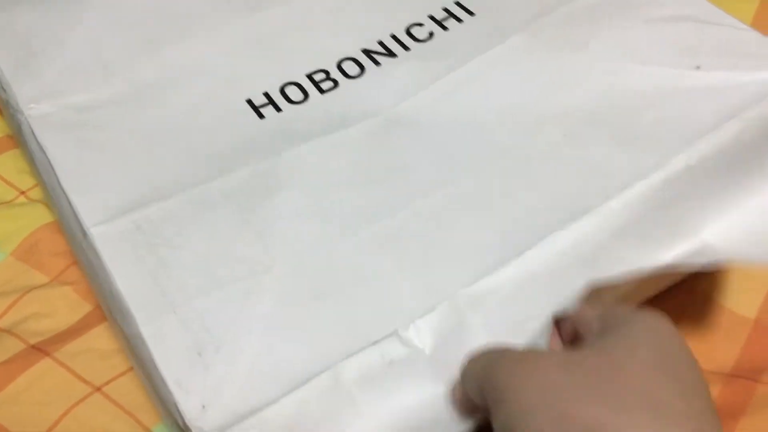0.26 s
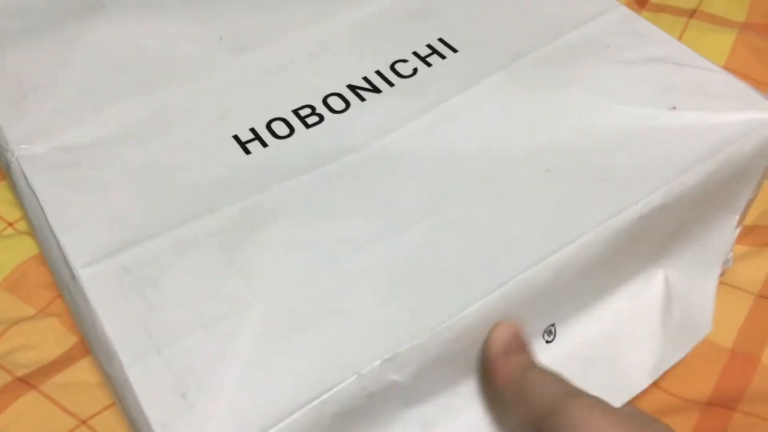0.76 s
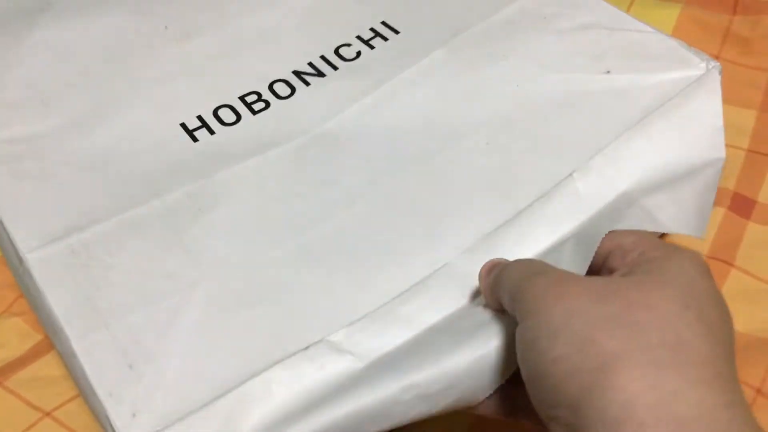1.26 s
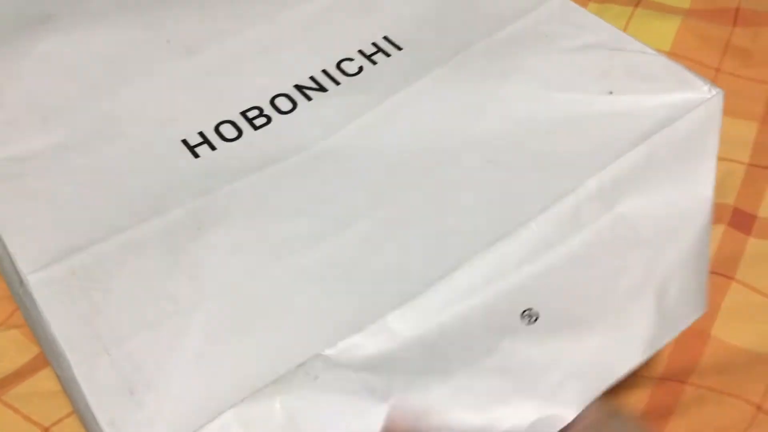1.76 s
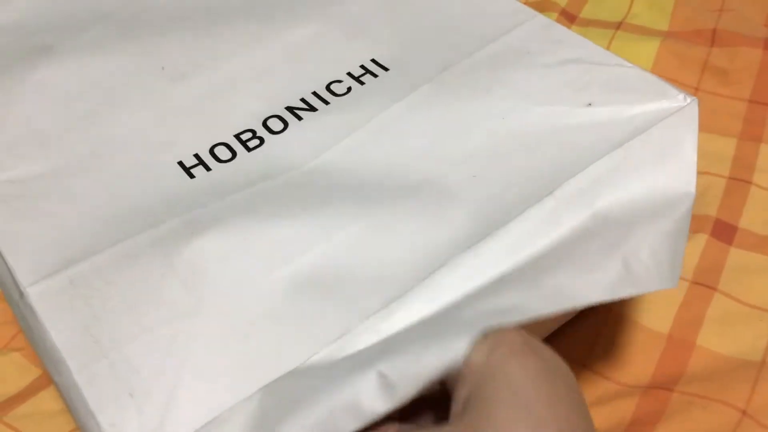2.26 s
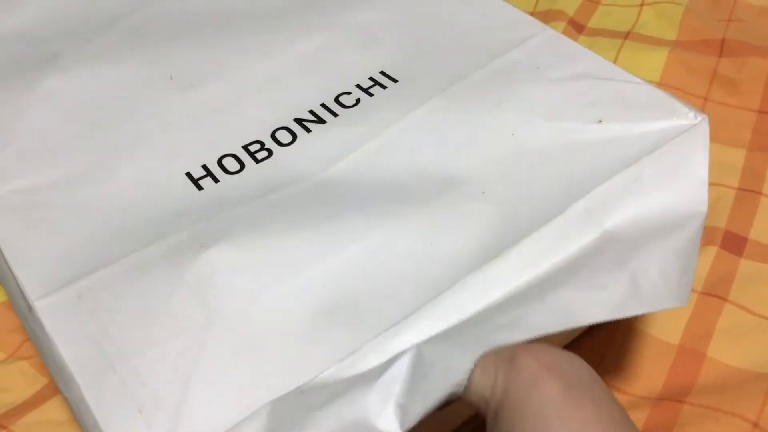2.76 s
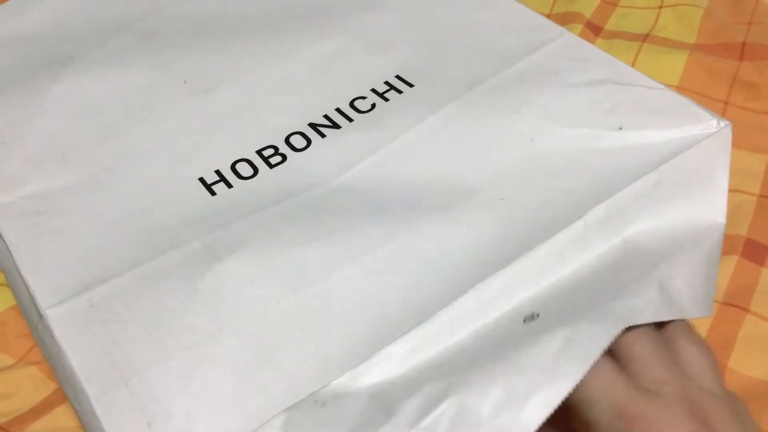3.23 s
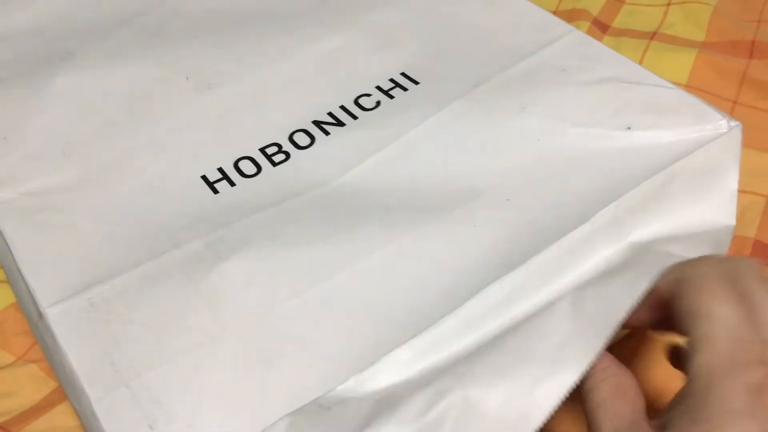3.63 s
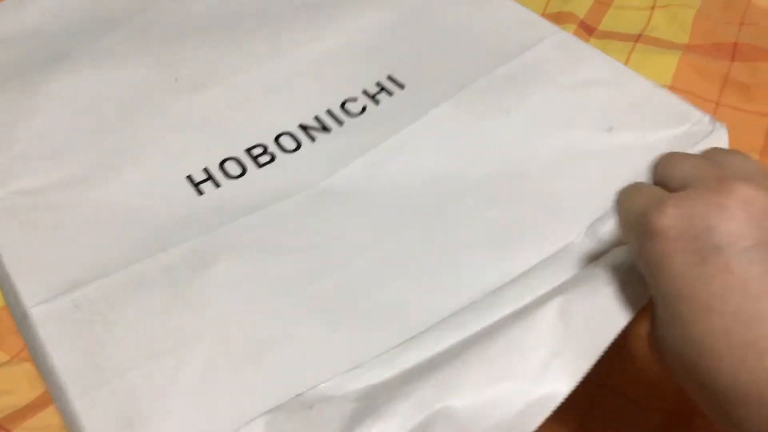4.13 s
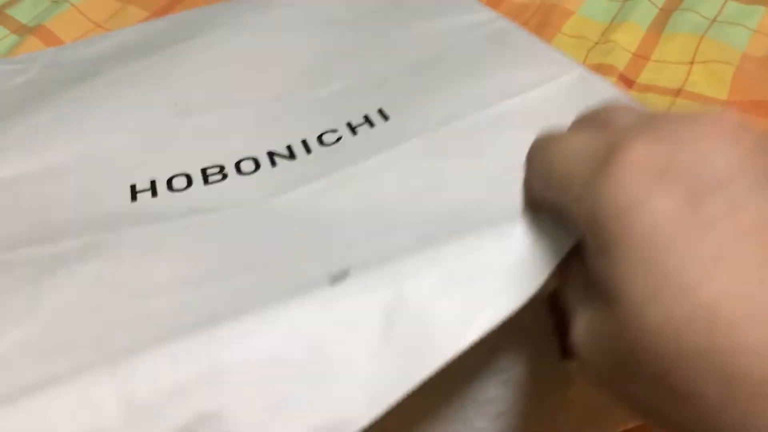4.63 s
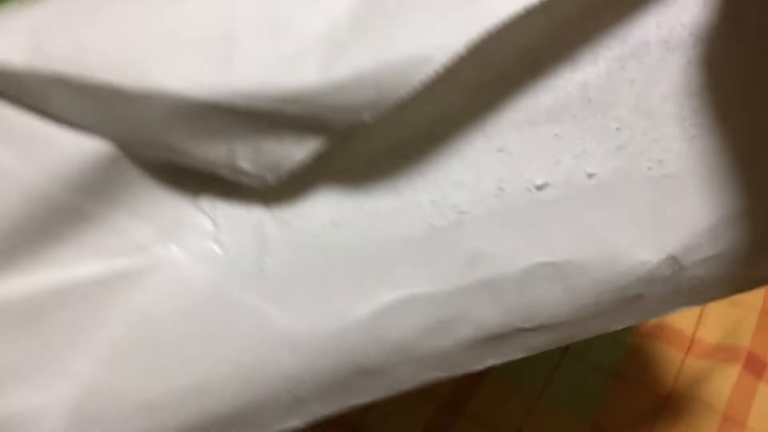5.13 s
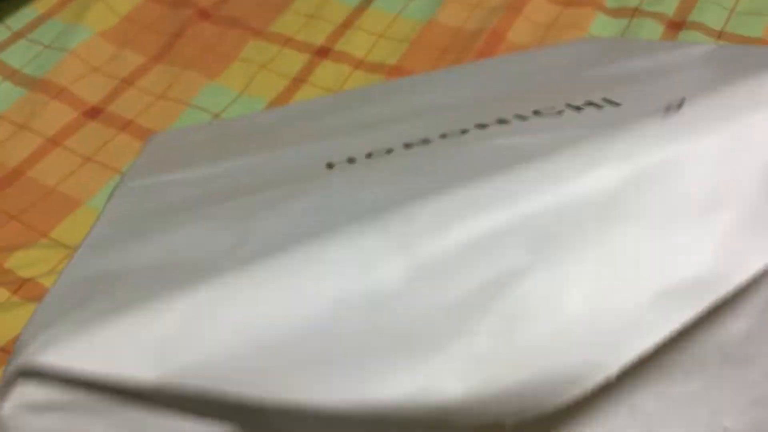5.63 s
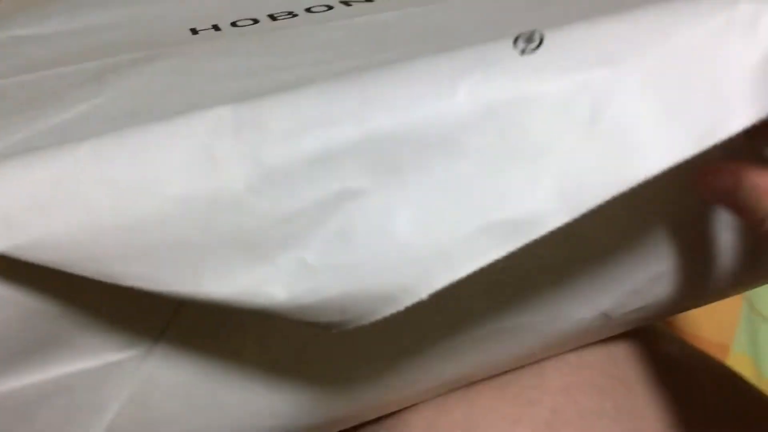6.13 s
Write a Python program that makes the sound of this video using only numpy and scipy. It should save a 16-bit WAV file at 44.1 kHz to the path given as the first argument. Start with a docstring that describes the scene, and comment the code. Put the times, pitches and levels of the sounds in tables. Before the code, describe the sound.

Very close to a small microphone, a hand handles a stiff paper bag on a cloth. A sharp bright snap comes early, then irregular crackles, dry papery rubs and short hisses. Broad panels flop with soft low thuds over an uneven handling rumble. Crackling thickens in the middle, a longer scrape comes as the mouth is lifted, then it thins out. Small, dry, quiet room.

```python
"""Paper shopping bag, close

A stiff paper bag lies on a cloth in a small quiet room; a hand opens it, reaches in and lifts its mouth.
Creases snap as quick steps that ring in the sheet; skin and paper slide as random grains of drone, rub and hiss.
Close to the microphone, broad panels flop as short low swings over a rumble of shaped noise.
The paper is heard through the air in the bag, its moving walls and a faint room."""
import sys
import numpy as np
from scipy import signal
from scipy.fft import rfft, irfft, next_fast_len
from scipy.io import wavfile
from scipy.ndimage import uniform_filter1d, map_coordinates

SR = 44100
rng = np.random.default_rng(int(sys.argv[2]) if len(sys.argv) > 2 else 0)


def to_wav(s):
    """Save 16-bit WAV."""
    ch = np.atleast_2d(s).T  # columns
    pcm = np.round(np.clip(ch, -1, 1) * 32767)  # PCM
    wavfile.write(sys.argv[1], SR, pcm.astype(np.int16))


N = 281799
TIME = np.arange(N) / SR

# Table levels are nominal: trims, the bag, the room and the microphone come after them.
# creases buckling: [t/s, level/dB, facet ring f/Hz, hollow re level/dB, fizz re level/dB]
SNAPS = [(0.0398, -40, 736, 4, -18), (0.146, -46.5, 1700, 2.5, -46), (0.1989, -38.5, 1326, 1.5, -35),
         (0.21, -36, 1840, -5, -2), (0.235, -41.5, 1920, -2, -16), (0.245, -42, 1100, 4, -8.5),
         (0.2628, -35.5, 1850, -19, -14), (0.2831, -23, 1500, 0.5, -1), (0.397, -57, 3200, 9.5, 5),
         (0.5525, -31, 1930, -7.5, -24), (0.7308, -27.5, 1830, -13, -20), (0.9707, -29.5, 1460, -14, -17.5),
         (1.1012, -30.5, 2090, -18, -29), (1.3792, -37, 2320, 1, 4), (1.4005, -31, 2380, -3, -11),
         (1.4891, -26, 1620, -4, -8), (1.561, -37.5, 1000, 2, -25), (1.6146, -45.5, 2270, 2, -38),
         (1.6615, -42.5, 1770, 3.5, -17), (1.7434, -43.5, 2110, -15, -15), (1.7496, -35.5, 2380, 2.5, -18),
         (1.7748, -32.5, 1030, -19, -18), (2.0277, -55.5, 1980, 4, -1), (2.0447, -45.5, 1600, -5, -7),
         (2.1422, -40.5, 1200, 0.5, -9.5), (2.194, -46, 2020, -11, -30), (2.2098, -46.5, 2300, -3.5, -0.5),
         (2.295, -33.5, 2320, -2, -10), (2.3228, -29.5, 2240, -14, -25), (2.3593, -30, 2030, -5, -8),
         (2.3973, -30.5, 2040, -4, -5.5), (2.4557, -41.5, 1560, -3, -3), (2.4847, -29.5, 1020, -1.5, -44),
         (2.6601, -36.5, 2310, -3, -32), (2.7352, -48, 2350, 0, -1.5), (2.7495, -45.5, 2170, 0, -16),
         (2.821, -46, 1530, -2, -2), (2.8844, -39.5, 2850, -0.5, -17), (2.97, -46, 2190, -8, 3),
         (3.0093, -37, 920, 2.5, -25), (3.0156, -32, 2220, -12, -16), (3.1441, -39, 2340, -1.5, -11),
         (3.1717, -43.5, 2990, -1, -3), (3.2007, -39, 1750, 0.5, -0.5), (3.293, -37, 2240, -7, -20),
         (3.311, -42, 2940, -8, -9), (3.3641, -37, 1030, 3, -18), (3.3814, -33.5, 1210, -4, -27),
         (3.4243, -34, 920, 5, 2), (3.4294, -32, 2230, -0.5, -8), (3.52, -41, 2760, -15, -28),
         (3.5447, -40.5, 2130, -8, -16), (3.693, -39.5, 873, -2, -36), (3.7811, -36, 3020, 1, -11.5),
         (3.9744, -32.5, 892, -6, -13), (4.0727, -45.5, 2070, -11, -25), (4.1883, -28.5, 2800, -7, 4),
         (4.428, -45, 1080, 4, -31), (4.4673, -39.5, 1970, -5, -4.5), (4.5718, -27.5, 1800, -8, -49),
         (4.578, -43, 1780, -11, -1), (4.7375, -33, 2400, -10, -40), (4.804, -46, 2070, -5, -2),
         (4.9623, -38, 1690, -14, -32), (4.9682, -31.5, 2460, -13.5, -20), (5.0205, -38, 1980, -12, -31),
         (5.0876, -30.5, 1600, -10, -25), (5.1265, -42.5, 1090, 1, -24), (5.1487, -38, 1660, -4, -9),
         (5.186, -28, 1390, -6.5, -42), (5.2627, -39, 1800, -4.5, -28), (5.4554, -43, 1280, 5.5, -52),
         (5.4821, -42.5, 1570, -14, -10), (5.5955, -37, 2400, -4.5, -13.5), (5.648, -48, 1630, -12, -43),
         (5.7816, -37, 2000, -17, -53), (5.8216, -45.5, 1410, -3, -17), (5.929, -43, 1990, 4.5, -6),
         (6.194, -41, 1680, -7, -15.5)]
# registers of a snap, in rows hollow, ring, crack, fizz: [low edge f/Hz, high edge f/Hz]
REGISTERS = [(350, 1200), (1200, 3200), (3200, 7000), (7000, 16000)]
# broad panels flopping: [middle t/s, peak level/dB, pitch f/Hz]
FLOPS = [(0.095, -25, 95), (0.121, -22.5, 144), (0.286, -19.5, 235), (0.409, -28.5, 109),
         (0.695, -27.5, 95.5), (0.941, -29, 86), (0.945, -31.5, 208), (0.969, -21.5, 178),
         (1.135, -21.5, 147), (1.165, -27.5, 108), (1.305, -31, 243), (1.355, -27, 138),
         (1.585, -24.5, 124), (1.784, -21.5, 156), (1.845, -22, 98.4), (1.972, -21, 125),
         (2.028, -22, 85.5), (2.297, -20.5, 133), (2.514, -22, 101), (2.644, -24.5, 91), (2.675, -30, 223),
         (2.682, -20.5, 116), (2.849, -26.5, 104), (2.983, -22.5, 91), (3.142, -25.5, 93.5),
         (3.191, -25.5, 130), (3.222, -24, 98), (3.247, -22.5, 111), (3.472, -28, 89.5), (3.558, -29, 70),
         (3.626, -29, 115), (3.661, -26.5, 215), (3.664, -22.5, 119), (4.128, -27, 105), (4.234, -20, 130),
         (4.313, -27, 117.5), (4.469, -27.5, 85), (4.837, -25, 81), (5.042, -23, 232), (5.048, -22.5, 115),
         (5.086, -24.5, 90), (5.177, -31.5, 246), (5.193, -27.5, 360), (5.243, -26.5, 99),
         (5.711, -23, 125), (5.776, -35, 272), (5.779, -19.5, 93.4), (5.812, -22.5, 86),
         (5.841, -28.5, 151), (5.976, -24.5, 110), (6.028, -21, 113.4), (6.054, -21, 177), (6.17, -26, 137),
         (6.322, -27, 116)]
# strokes of the hand along the paper: [middle t/s, half length t/s, rub level/dB, hollow re rub/dB, hiss re rub/dB]
STROKES = [(0.12, .012, -57.5, 14, -19), (0.233, .03, -50, 3, 3.5), (0.309, .03, -42, 4, 5.5),
           (0.407, 0.017, -48.5, -14.5, -1), (0.497, .06, -54, -4, 5), (0.75, .035, -58, 4, 7),
           (0.946, .03, -48.5, 3, -8), (1.216, .095, -39.5, 1.5, -1), (1.411, .05, -41.5, 3.5, 0.5),
           (1.776, .04, -51, 9, -2), (1.882, .045, -54, -4, -16), (2.146, .02, -52, 3, -6),
           (2.487, 0.027, -54, 4, -8), (2.669, .022, -46.5, -2, -25), (2.779, .05, -49, 1.5, -5.5),
           (2.9, .026, -50.5, -3, -5), (2.977, .02, -45.5, 1, -5), (3.205, .09, -55.5, 6.5, 3),
           (3.298, .02, -57, 2, 3), (3.377, 0.018, -45.5, 4.5, -8.5), (3.433, .028, -49, 10, 3.5),
           (3.601, .035, -51.5, 8.5, -5), (3.787, .04, -49, 3, -1.5), (4.224, .028, -47.5, 8, -1),
           (4.36, .16, -56.5, 3, -13), (4.565, .115, -43, -15, -3.5), (4.749, .025, -49, 2.5, -7),
           (4.891, 0.1, -50.5, -17, -1), (5.04, .03, -41, 1, -1), (5.13, .07, -45.5, 0, -4.5),
           (5.197, .018, -44.5, 2, -9), (5.495, .05, -59.5, 8, -10), (5.79, .022, -49.5, 1.5, -19),
           (5.915, .02, -55.5, 1, 6), (6.23, 0.036, -61, -6, -6)]
# hiss of the paper creeping between strokes: [t/s, level/dB]
CREEP_HISS = [(0, -56.5), (0.16, -65), (0.63, -61), (1.02, -61.5), (1.52, -57), (1.63, -65), (1.9, -57),
              (1.97, -71), (2.08, -62.5), (2.46, -68), (2.56, -80), (2.64, -75), (2.71, -64), (3.28, -57),
              (3.34, -62), (3.52, -66), (3.6, -57.5), (3.9, -59.5), (4.06, -67.5), (4.2, -51), (5.25, -62),
              (5.85, -67), (6.03, -73.5), (6.39, -66)]
# sizzle, the very high fizz of the louder strokes: [middle t/s, half length t/s, peak level/dB]
SIZZLES = [(0.296, 0.044, -43), (1.205, 0.13, -49.5), (4.56, 0.12, -52), (5.097, 0.14, -49),
           (5.522, .035, -57)]
# the bag is heaved (+) or comes to rest (-): [middle t/s, half length t/s, change of rumble level/dB]
SHIFTS = [(0.0, 0.037, -2.5), (0.81, .06, -11.5), (0.98, 0.15, 5), (1.85, 0.13, 5), (2.98, .03, 7),
          (3.68, 0.19, 3), (3.92, 0.037, -20), (4.73, .04, -7), (4.83, 0.021, 9), (4.93, 0.045, -6),
          (5.17, 0.028, 6.5), (5.62, .06, -9.5), (5.77, .07, 7.5)]
# spectra of the hollow drone, rub, hiss, rumble and still air: [f/Hz, relative level per Hz/dB]
HOLLOW_COLOUR = [(220, 8.5), (370, -0.5), (490, 2.5), (620, -1.5), (800, -1), (1100, 2), (1400, -7.5),
                 (2200, -61)]
RUB_COLOUR = [(800, -31), (1350, 7.5), (1900, 8), (2400, 7), (3100, 2.5), (4000, 1), (5500, -35),
              (12000, -21)]
HISS_COLOUR = [(2000, -1), (4000, 1), (5600, 0.5), (7500, -2), (9300, -0.5), (12500, -4.5), (15200, -9.5),
               (16000, -21)]
RUMBLE_COLOUR = [(22, -22), (30, -28), (42, -5), (58, -0.5), (80, -6.5), (110, -11), (160, -17), (250, -28),
                 (400, -35), (800, -82)]
ROOM_COLOUR = [(25, 17), (58, -3), (120, -22), (300, -20), (1000, -24), (3000, -54), (8000, -52),
               (16000, -61)]
# resonances of the air in the bag: [f/Hz, width f/Hz, level re direct sound/dB]
BAG_MODES = [(630, 18, -4), (912, 34, -10.5), (1112, 20, -15), (1770, 11, -61)]

# the sharper a snap, the more it cracks: crack dB at a fizz of 0 dB, and dB of crack per dB of fizz
CRACK_DB, CRACK_FOLLOWS_FIZZ = 0.5, 0.39
# lesser creases: average rate, and mean level, hollow and fizz (the last two relative to the level)
LESSER_PER_S, LESSER_DB, LESSER_HOLLOW_DB, LESSER_FIZZ_DB = 6, -55, 3.5, -9.5
CREEP_RUB_DB, CREEP_HOLLOW_DB = -63.5, -58
RUMBLE_DB = -36
FOLD_DELAY_S = 0.041  # spread of the smaller folds around a broad panel
ROOM_T60_S = 0.18
CUTOFF_HZ = 16000


def from_db(db):
    """Decibels to gain."""
    return 10 ** (np.asarray(db) / 20)


def rms_one(x):
    """Scale to rms 1."""
    return x / np.sqrt(np.mean(x ** 2) + 1e-20)


def in_time(rows):
    """Each column of a curve at every sample."""
    s, *columns = np.transpose(rows)
    return [np.interp(TIME, s, column) for column in columns]


def bell(s, half_s):
    """A movement that gathers speed and slows again; 1 at its middle."""
    return np.exp(-np.minimum(((TIME - s) / half_s) ** 2, 50))


def add(out, sound, s):
    """Mix a sound in from a given time on."""
    at = int(np.clip(round(s * SR), 0, N - 1))
    out[at:at + len(sound)] += sound[:N - at]


def band(x, low_hz, high_hz, order=2):
    """Causal band-pass."""
    edges = [low_hz, min(high_hz, .45 * SR)]
    return signal.sosfilt(signal.butter(order, edges, "band", fs=SR, output="sos"), x + 1e-18)


def resonate(x, hz, width_hz):
    """One resonance, gain 1 on top."""
    radius = np.exp(-np.pi * width_hz / SR)
    zeros = np.array([1, 0, -1]) * (1 - radius ** 2) / 2
    poles = [1, -2 * radius * np.cos(2 * np.pi * hz / SR), radius ** 2]
    return signal.lfilter(zeros, poles, x + 1e-18)


def coloured(x, colour):
    """Give a steady texture a spectrum, falling away below its first point; rms 1."""
    hz, db = np.transpose(colour)
    size = next_fast_len(N)
    bins = np.maximum(np.fft.rfftfreq(size, 1 / SR), 1)
    gain = from_db(np.interp(np.log(bins), np.log(hz), db))
    bass_rolloff = np.minimum(bins / hz[0], 1) ** 2
    return rms_one(irfft(rfft(x, size) * gain * bass_rolloff, size)[:N])


def shaped(x, hz, db):
    """Causal (minimum-phase) filter with a curve through the given gains."""
    size = len(x)
    bins = np.maximum(np.fft.rfftfreq(size, 1 / SR), 1)
    cepstrum = irfft(np.log(from_db(np.interp(np.log(bins), np.log(hz), db))))
    # fold the cepstrum forward in time
    cepstrum[1:size // 2] *= 2
    cepstrum[size // 2 + 1:] = 0
    return irfft(rfft(x) * np.exp(rfft(cepstrum)))


def drift(per_s):
    """Slow chance with spread 1."""
    knots = rng.standard_normal(4096)
    return rms_one(np.interp(TIME * per_s, np.arange(len(knots)), knots))


def grains(per_s, spread_db):
    """Clicks at random moments, many small and a few large."""
    sizes = from_db(spread_db * np.minimum(rng.exponential(1, N), 4))
    return (rng.random(N) < per_s / SR) * sizes * rng.choice([-1, 1], N)


def rumble(evenness=0.1):
    """The large soft walls of the bag shudder as long as it is moved."""
    handling_db = RUMBLE_DB + sum(change_db * bell(s, half_s) for s, half_s, change_db in SHIFTS)
    shudder = coloured(rng.standard_normal(N), RUMBLE_COLOUR)
    swell = np.sqrt(np.abs(uniform_filter1d(shudder ** 2, size=3000)))
    return rms_one(shudder / swell ** evenness) * from_db(handling_db)


def still_air(level_db):
    """The quiet room tone: steady noise, strongest in the bass."""
    return from_db(level_db) * coloured(rng.standard_normal(N), ROOM_COLOUR)


def stroke_levels():
    """Levels in dB of hollow drone, rub and hiss: strokes swell and fade above the creeping of the paper."""
    creep_hiss_db, = in_time(CREEP_HISS)
    hollow = from_db(CREEP_HOLLOW_DB) ** 2
    rub = from_db(CREEP_RUB_DB) ** 2
    hiss = from_db(creep_hiss_db) ** 2
    for s, half_s, rub_db, hollow_db, hiss_db in STROKES:
        power = (from_db(rub_db) * bell(s, half_s)) ** 2
        hollow = hollow + power * from_db(hollow_db) ** 2
        rub = rub + power
        hiss = hiss + power * from_db(hiss_db) ** 2
    return 10 * np.log10([hollow, rub, hiss])


def sliding(hollow_db, rub_db, hiss_db, hollow_trim_db=-2.0, rub_trim_db=0.0, hiss_trim_db=0.0,
            brightening=0.35, fine_hz=9000):
    """Fibres catch and let go thousands of times a second; coarser catches shake the sheet and the bag's air."""
    judder_db = .9 * drift(110)
    hollow = coloured(grains(per_s=2500, spread_db=0.5), HOLLOW_COLOUR) * from_db(hollow_db + hollow_trim_db)
    rub = coloured(grains(per_s=4000, spread_db=3.5), RUB_COLOUR) * from_db(rub_db + rub_trim_db)
    hiss = coloured(grains(per_s=22000, spread_db=8.0), HISS_COLOUR)
    # softer hiss, as in slow sliding, loses some of its finest part
    low_pass = signal.butter(2, min(fine_hz, .45 * SR), fs=SR, output="sos")
    soft = signal.sosfiltfilt(low_pass, hiss)
    fine_gain = from_db(brightening * np.minimum(hiss_db - np.percentile(hiss_db, 75), 0))
    hiss = (soft + fine_gain * (hiss - soft)) * from_db(hiss_db + hiss_trim_db)
    return from_db(judder_db) * (hollow + rub + hiss)


def crinkles(rub_db, per_s=130, level_db=-61.0, follow=0.91, width_hz=300, edge=0.024):
    """Tiny wrinkles give way under the hand on facets of twelve pitches; harder rubbing makes them louder."""
    pitches = np.geomspace(700, 3000, num=12)
    out = np.zeros(N)
    for hz in pitches:
        clicks = grains(per_s / len(pitches), spread_db=4.5)
        out += resonate(clicks, hz, width_hz) + edge * band(clicks, 1600, 7300, order=1)
    effort_db = follow * (rub_db - np.mean(rub_db))
    return rms_one(band(out, 360, 15400)) * from_db(level_db + effort_db)


def lesser_snaps(rub_db, follow=.7, spread_db=1.0, colour_spread_db=0.5, ring_hz=1800):
    """Rows for lesser creases at random, likelier and louder where the hand rubs harder."""
    effort_db = follow * (rub_db - np.mean(rub_db))
    chance = np.cumsum(from_db(effort_db))
    rows = []
    for _ in range(int(LESSER_PER_S * N / SR)):
        at = np.searchsorted(chance, rng.random() * chance[-1])
        size, pitch, hollow, fizz = rng.standard_normal(4)
        rows.append((TIME[at],
                     LESSER_DB + effort_db[at] + spread_db * size,
                     ring_hz * 2 ** (.5 * pitch),
                     LESSER_HOLLOW_DB + colour_spread_db * hollow,
                     LESSER_FIZZ_DB + colour_spread_db * fizz))
    return rows


def dispersed(x, lag_s):
    """Bending waves: highs run ahead of lows; lag_s is the travel time at 1 kHz."""
    khz = np.fft.rfftfreq(len(x), 1 / SR) / 1000
    return irfft(rfft(x) * np.exp(-4j * np.pi * 1000 * lag_s * np.sqrt(khz)))


def snaps(rows, ring_width_hz=520, ring_db=2.5, step_s=.0006, step_size=0.7, scatter=0.16, scatter_t60=0.024,
          scatter_hz=3200, tail_db=-14.0, tail_t60=0.047, trim_db=0.38, bass_db=0.0, top_db=-14.0, lag_s=0.000435):
    """A crease pops through in quick steps; the bending wave scatters over its ringing facet and dies away."""
    out, t = np.zeros(N), np.arange(8192) / SR
    attack = SR // 200  # five milliseconds
    centres = np.sqrt(np.prod(REGISTERS, axis=1))
    for s, level_db, ring_hz, hollow_db, fizz_db in rows:
        crack_db = CRACK_DB + CRACK_FOLLOWS_FIZZ * fizz_db
        waves = rng.standard_normal((3, len(t)))
        push = scatter * band(waves[0], 89, scatter_hz, order=1) * from_db(-60 * t / scatter_t60)
        # the fold settles with a fine crackle
        push += scatter * waves[1] * np.abs(waves[2]) * from_db(tail_db - 60 * t / tail_t60)
        # the first step, then three smaller ones of either sign
        push[0] += 1
        steps = np.cumsum(rng.exponential(1, size=3)) * step_s
        at = np.minimum(steps * SR, attack).astype(int)
        push[at] += step_size ** np.arange(1, 4) * rng.choice([-1, 1], size=3)
        ringing = push + from_db(ring_db) * resonate(push, ring_hz, ring_width_hz)
        wave = dispersed(ringing, lag_s)
        # set the registers from their levels over the attack
        raw_db = np.array([10 * np.log10(np.mean(band(wave[:attack], low, high) ** 2)) for low, high in REGISTERS])
        gains_db = level_db + trim_db + np.array([hollow_db, 0, crack_db, fizz_db]) - raw_db
        curve_db = [gains_db[0] + bass_db, *gains_db, gains_db[-1] + top_db]
        add(out, shaped(wave, [150, *centres, 16000], curve_db), s)
    return out


def lesser_flops(per_s=3, peak_db=-34, spread_db=4.0, pitch_hz=105):
    """Rows for the smaller folds, which swing over at random shortly before or after a broad panel."""
    rows = []
    for _ in range(int(per_s * N / SR)):
        panel_s = FLOPS[rng.integers(0, len(FLOPS))][0]
        delay, size, pitch = rng.standard_normal(3)
        rows.append((panel_s + FOLD_DELAY_S * delay, peak_db + spread_db * size, pitch_hz * 2 ** (.5 * pitch)))
    return rows


def flops(rows, level_db=0.0, cycles=0.62, settle=1.93, flutter_db=-16.0, flutter_hz=280):
    """A panel swings over and pushes air, building faster than it settles, with a flutter of smaller folds."""
    out, lead = np.zeros(N), SR // 20
    t = np.arange(-lead, lead) / SR
    for (s, peak_db, hz), turn in zip(rows, rng.random(len(rows))):
        swell = np.exp(-(t * hz / (cycles * np.where(t > 0, settle, 1))) ** 2)
        swing = np.sin(2 * np.pi * (hz * t + turn))
        flutter = from_db(flutter_db) * rms_one(band(rng.standard_normal(len(t)), 116, flutter_hz, order=3))
        add(out, from_db(peak_db + level_db) * swell * (swing + flutter), s - lead / SR)
    return out


def sizzle():
    """A fine, very high sizzle of dense grains that swells and fades with the louder strokes."""
    swell = sum(from_db(db) * bell(s, half_s) for s, half_s, db in SIZZLES)
    return swell * rms_one(band(grains(per_s=16000, spread_db=11.0), 9900, 16500, order=2))


def bag(x):
    """The air between the paper walls rings briefly at a few pitches."""
    return x + sum(from_db(db) * resonate(x, hz, width_hz) for hz, width_hz, db in BAG_MODES)


def wall_echo(x, share=0.14):
    """The moving paper walls reflect the sound within about a millisecond, so its colour keeps shifting."""
    out = x.copy()
    for lag_s, sway in [(.00012, .45), (.001, .2)]:
        lag = lag_s * SR * np.exp(sway * drift(7))  # in samples
        out += share * map_coordinates(x, [np.arange(N) - lag], order=3)
    return out


def room(x, wet_db=-16.5, wall_hz=6000, first_s=0.011):
    """Faint, dulled reflections of a furnished room: decaying noise after a short gap."""
    t = np.arange(SR // 2) / SR
    decay = (t > first_s) * from_db(-60 * t / ROOM_T60_S)
    echoes = band(rng.standard_normal(len(t)) * decay, 230, wall_hz, order=1)
    return from_db(wet_db) * signal.fftconvolve(x, echoes / np.sqrt(np.sum(echoes ** 2) * 2))[:N]


def scene(air_db=-53.0, paper_db=-0.34):
    """Paper sounds through the bag and the room, the low movement of the bag and still air."""
    hollow_db, rub_db, hiss_db = stroke_levels()
    paper = sliding(hollow_db, rub_db, hiss_db) + crinkles(rub_db)
    paper += snaps(SNAPS + lesser_snaps(rub_db)) + sizzle()
    paper = from_db(paper_db) * wall_echo(bag(paper))
    low_movement = rumble() + flops(FLOPS + lesser_flops())
    return (paper + room(paper) + low_movement + still_air(air_db))[None]


def record(dry, low_cut_hz=33, notch_hz=10400, notch_width_hz=900, notch_depth=0.51, ceiling=0.47):
    """A small microphone: no deep bass, a notch from its port, rounded peaks; the top is cut steeply."""
    x = signal.sosfilt(signal.butter(3, low_cut_hz, "high", fs=SR, output="sos"), dry)
    x = x - notch_depth * resonate(x, notch_hz, notch_width_hz)
    x = ceiling * np.tanh(x / ceiling)
    return signal.sosfilt(signal.ellip(10, .2, 80, CUTOFF_HZ, fs=SR, output="sos"), x)


dry = scene()
out = record(dry)
to_wav(out)
```